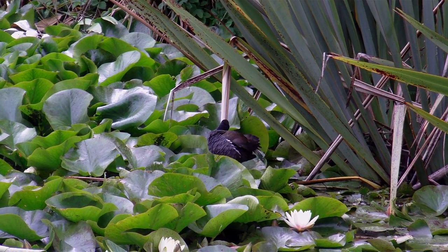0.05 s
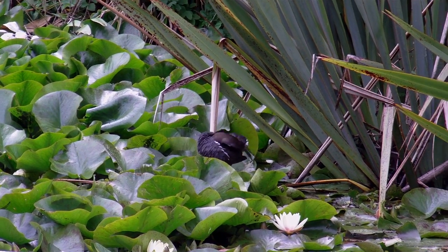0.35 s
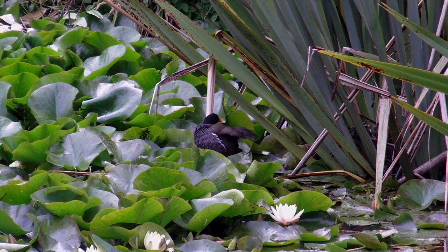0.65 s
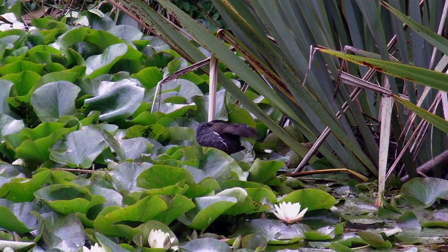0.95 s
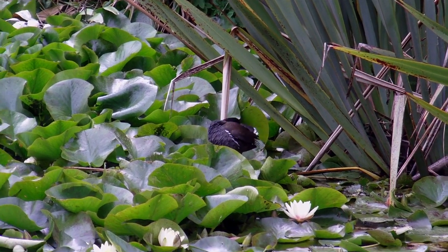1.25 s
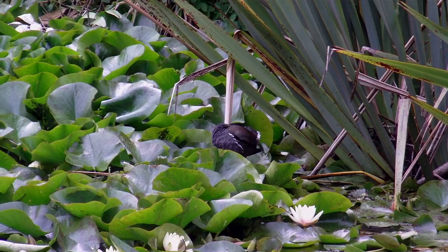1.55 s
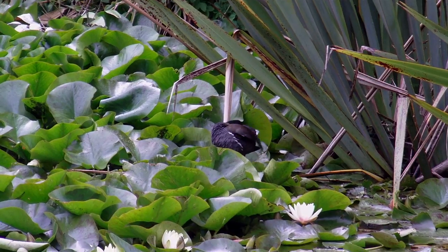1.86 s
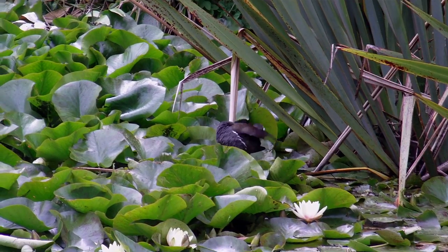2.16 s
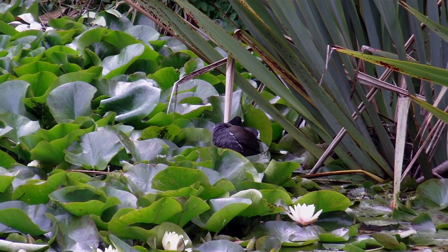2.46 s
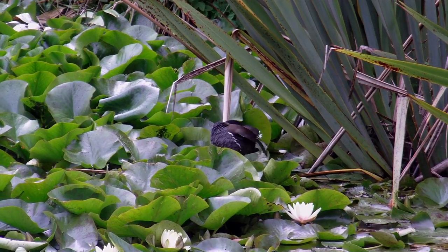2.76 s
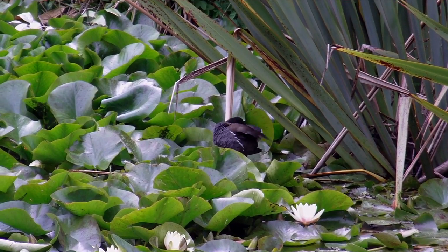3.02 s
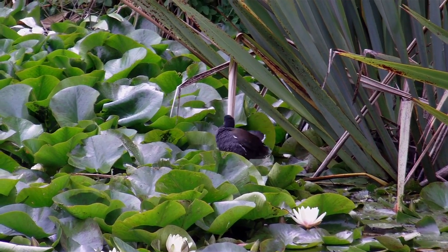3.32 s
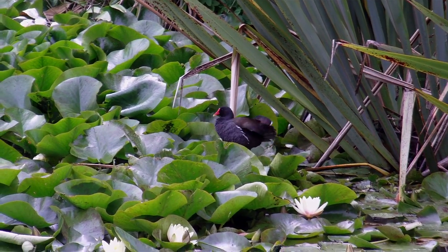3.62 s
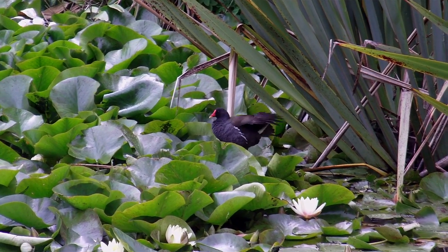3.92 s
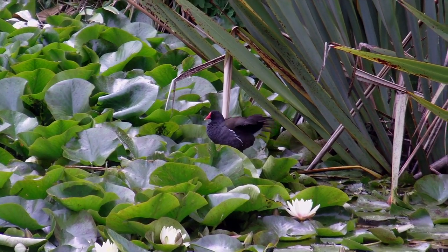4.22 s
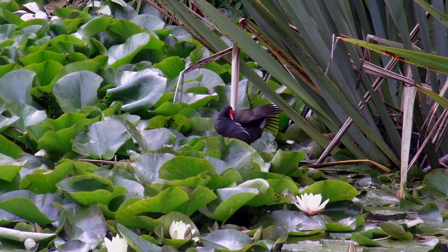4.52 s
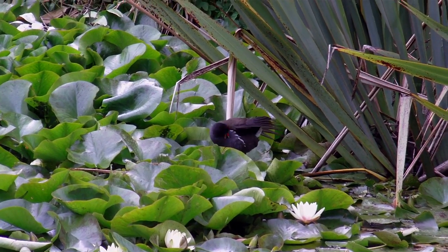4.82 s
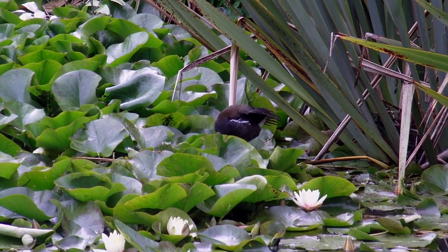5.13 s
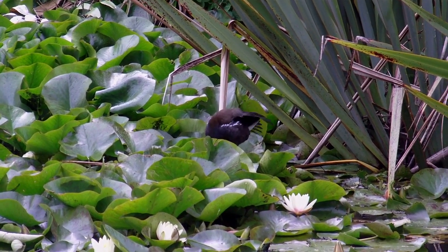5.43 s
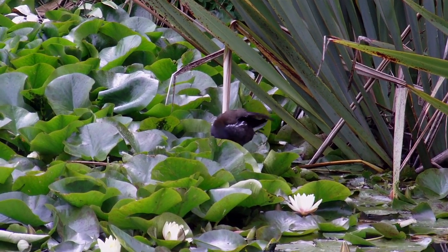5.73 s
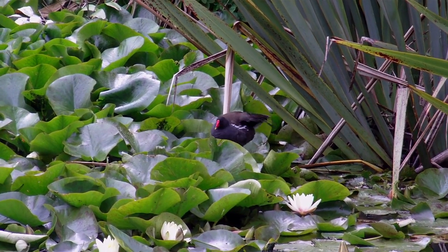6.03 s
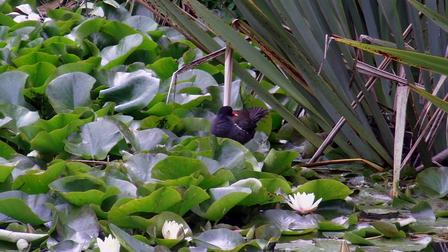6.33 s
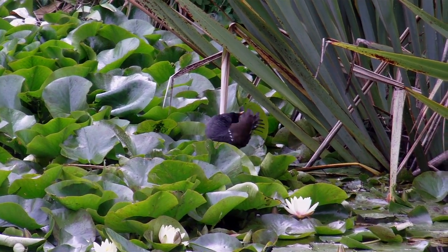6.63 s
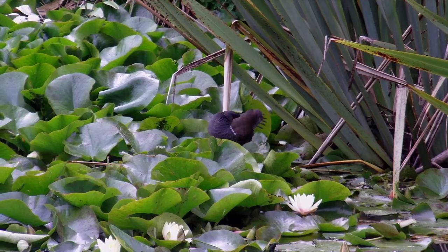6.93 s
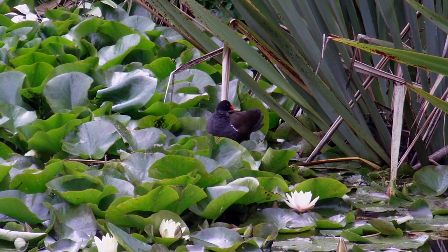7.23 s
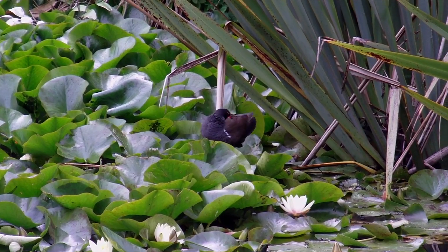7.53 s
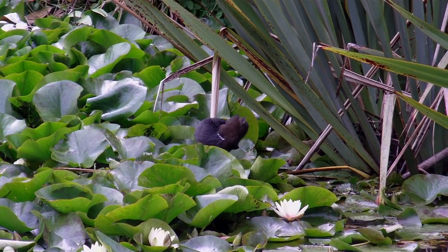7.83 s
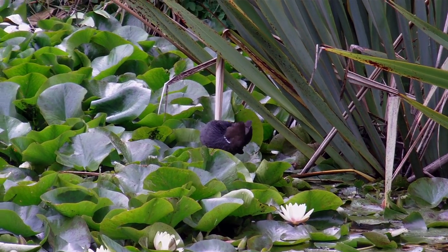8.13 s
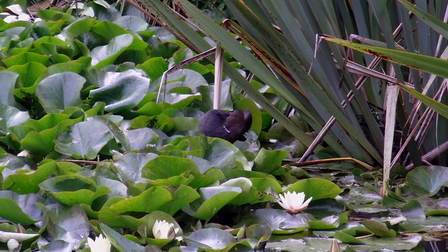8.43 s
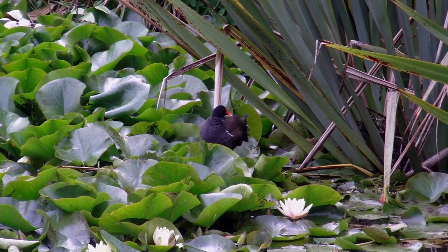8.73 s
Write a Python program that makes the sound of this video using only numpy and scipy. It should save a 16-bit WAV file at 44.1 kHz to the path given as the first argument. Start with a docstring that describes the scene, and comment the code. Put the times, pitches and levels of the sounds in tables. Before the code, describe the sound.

Beside a pond, a soft, even rush like distant water or traffic carries on throughout. Over it a warbler repeats sharp downward chirps, about three a second, and a second one overlaps it later. Fluty whistles come from farther off at the opening and toward the close, with thin twittering in between. Leaves and trees add a slight echo, and the microphone picks up a faint high buzz and two small ticks.

```python
"""Warblers by a lily pond

Two small warblers sing 'chiff-chaff': steep downward notes that echo in the foliage, some trailed
by quick flicks. A farther songbird whistles at the start and near the end; others twitter in the
middle. Each voice is a gliding near-pure tone, scattered by leaves and trunks. Underneath lie a
steady rush like far traffic or water, two dry ticks and a faint buzz of camera electronics."""
import sys
import numpy as np
from scipy import signal
from scipy.fft import rfft, irfft
from scipy.io import wavfile
from scipy.ndimage import uniform_filter1d

SR = 44100
rng = np.random.default_rng(int(sys.argv[2]) if len(sys.argv) > 2 else 0)


def log_audio(samples):
    """Write samples as a 16-bit WAV file to the path given in sys.argv[1]."""
    # one column per channel
    frames = np.atleast_2d(samples).T
    # limit to full scale, then quantise
    limited = np.clip(frames, -1, 1)
    pcm = np.round(limited * 32767).astype(np.int16)
    wavfile.write(sys.argv[1], SR, pcm)


N = 386757


def gain_of(db):
    """Decibels to amplitude."""
    return 10 ** (np.asarray(db) / 20)


def unit_rms(x):
    """Scales to rms 1."""
    return x / np.sqrt(np.mean(x ** 2) + 1e-20)


def add(mix, start_s, sound):
    """Mixes a sound in at its start time."""
    part = mix[max(round(start_s * SR), 0):][:len(sound)]
    part += sound[:len(part)]


def wander(count, rate_hz):
    """Smooth random modulation, rms about 1, moving at up to about the given rate."""
    hz = np.fft.rfftfreq(count + SR, 1 / SR)
    spectrum = rfft(rng.standard_normal(count + SR)) * np.exp(-(hz / rate_hz) ** 2)
    return unit_rms(irfft(spectrum))[:count]


def syrinx(rows, waver, waver_hz, edge_s=0.0011):
    """A bird's voice: a sine along rows of t/s, f/Hz, level/dB, trembling by a share of its pitch."""
    times, hz, db = np.transpose(rows)
    t = np.arange(times[0], times[-1], 1 / SR)
    pitch = np.interp(t, times, hz) * (1 + waver * wander(len(t), waver_hz))
    edges = np.clip(np.minimum(t - t[0], t[-1] - t) / edge_s, 0, 1)
    envelope = edges * gain_of(np.interp(t, times, db))
    return np.sqrt(2) * envelope * np.sin(2 * np.pi * np.cumsum(pitch) / SR)


def foliage(x, early_t60, late_t60, late_db, build_s=0.0032, tilt_db_per_octave=0):
    """Woodland reverb: dense scatter from near leaves and trunks, then a tail from the far trees."""
    t = np.arange(SR * 2 // 3) / SR
    near, far = rng.standard_normal((2, len(t)))
    near = near * gain_of(-60 * t / early_t60) * (1 - np.exp(-t / build_s))
    far = far * gain_of(-60 * t / late_t60) * (1 - np.exp(-t / 0.036))
    impulse = unit_rms(near) + gain_of(late_db) * unit_rms(far)
    octaves = np.log2(np.clip(np.fft.rfftfreq(len(t), 1 / SR), 3000, 6000) / 5000)
    response = rfft(impulse / np.linalg.norm(impulse)) * gain_of(tilt_db_per_octave * octaves)
    return signal.fftconvolve(x, irfft(response, len(t)))


def distant_rush(trim_db=0.5, patchy_db=0.26, size=2048, hop=512):
    """A smooth noise bed, strongest near 1 kHz; the low mids ease, the rumble drifts, the hiss holds."""
    # the bed's spectrum: f/Hz, relative level/dB
    rush_colour = [(30, -47), (38, -24), (54, -39), (78, -25), (140, -26), (200, -15.5), (245, -18),
                   (300, -14.5), (370, -13), (572, -5), (1030, 0.3), (1270, -2.1), (1600, -8), (2000, -11),
                   (3359, -23.5), (6500, -37.5), (14000, -49)]
    # its slow movement: t/s, overall level/dB, low-mid gain/dB, rumble gain/dB
    rush_level = [(0, -47, 3, -5), (1, -47, 0.4, -1), (3.3, -47, 0, -.5), (5, -47, -0.2, -3),
                  (7, -47, -0.2, -2), (8.77, -47, -1.5, 1.5)]
    colour_hz, colour_db = np.transpose(rush_colour)
    times, overall_db, low_mid_db, rumble_db = np.transpose(rush_level)
    t = np.arange(N // hop + 5) * hop / SR
    hz = np.fft.rfftfreq(size, 1 / SR)
    real, imaginary, patches = rng.standard_normal((3, len(t), len(hz)))
    patches = uniform_filter1d(patches, size=10, axis=0)  # smooth in time, then in frequency
    patches = unit_rms(uniform_filter1d(patches, size=16, axis=1))
    colour = np.interp(np.log(hz + 1), np.log(colour_hz), colour_db) - 30 * (hz < 15)
    low_mids = np.interp(t, times, low_mid_db)[:, None] / (1 + (hz / 750) ** 4)
    rumble = np.interp(t, times, rumble_db)[:, None] / (1 + (hz / 90) ** 2)
    spectra = (real + 1j * imaginary) * gain_of(colour + patchy_db * patches + low_mids + rumble)
    _, noise = signal.istft(spectra.T, nperseg=size, noverlap=size - hop)
    return unit_rms(noise[:N]) * gain_of(overall_db.mean() + trim_db)


def camera_buzz(level_db=-68, frame_hz=60.052, ring_hz=7900, ring_db=-15, ring_delay_s=0.0038):
    """The electronics tick once a frame with alternating sign; a brief high ring follows each tick."""
    t = np.arange(N) / SR - 0.0105
    frame = np.round(t * frame_hz)
    age = t - frame / frame_hz
    tick = np.exp(-(age / 0.00047) ** 2)
    ring = gain_of(ring_db) * np.exp(-((age - ring_delay_s) / 0.00086) ** 2)
    return gain_of(level_db) * (-1) ** frame * (tick + ring) * np.sin(2 * np.pi * ring_hz * age)


def dry_ticks(log_width=0.22, attack_s=0.0003, decay_s=0.002):
    """Tiny bursts of band-passed noise, like a dry reed snapping."""
    # snaps: t/s, band centre/Hz, level/dB
    ticks = [(1.066, 3200, -53), (3.205, 9500, -69.5)]
    out, t = np.zeros(N), np.arange(SR // 50) / SR
    hz = np.fft.rfftfreq(len(t), 1 / SR)
    for start_s, centre_hz, db in ticks:
        burst = rng.standard_normal(len(t)) * np.exp(-t / decay_s) * (1 - np.exp(-t / attack_s))
        band = np.exp(-0.5 * (np.log((hz + 1) / centre_hz) / log_width) ** 2)
        snap = irfft(rfft(burst) * band, len(t))
        add(out, start_s, gain_of(db) * snap / snap[:round(decay_s * SR)].std())
    return out


def twittering_birds(trim_db=-4, echo_db=-3, rasp_depth_hz=210, rasp_db=2.5):
    """Falling chirps, most from farther birds deep in the trees, the last two quick flicks trailing a warbler's
    note; all rasp in pitch and level, with nearly as much echo as voice."""
    # chirps: t/s, length/s, first pitch/Hz, last pitch/Hz, level before trim/dB; the last two are flicks after
    # the warbler's note at 4.77 s
    twitters = [(3.32, .09, 8540, 8060, -68.5), (3.603, 0.14, 7900, 7040, -72),
                (3.917, 0.029, 4010, 3820, -54.5), (3.949, 0.038, 3650, 3290, -56),
                (3.987, .022, 4040, 3500, -59), (4.063, 0.04, 4400, 4020, -48.5),
                (4.088, 0.045, 4080, 3620, -55), (4.12, 0.027, 4100, 3250, -58),
                (4.328, .042, 5780, 3460, -49), (4.37, .026, 3260, 3030, -55),
                (4.855, 0.022, 4900, 4270, -60), (4.899, 0.022, 4750, 4200, -60.5)]
    out, progress = np.zeros(N), np.linspace(0, 1, 100)
    swell_db = np.interp(progress, [0, 0.44, 1], [-15, 0, -7])
    for start_s, length_s, first_hz, last_hz, db in twitters:
        hz = last_hz + (first_hz - last_hz) * (1 - progress) ** 1.4  # the fall flattens out
        contour = np.transpose([progress * length_s, hz, db + trim_db + swell_db])
        tone = syrinx(contour, waver=rasp_depth_hz / first_hz, waver_hz=453)
        tone *= unit_rms(gain_of(rasp_db * wander(len(tone), rate_hz=160)))
        add(out, start_s, tone)
        add(out, start_s, gain_of(echo_db) * foliage(tone, early_t60=0.15, late_t60=1.0, late_db=-1))
    return out


def whistling_bird(trim_db=-1, echo_db=-12.5, flutter_hz=28.7):
    """Fluty whistles, a few husky, glide onto a pitch, flutter and slip off it; far trees add a tail."""
    # whistles: t/s, length/s, first pitch/Hz, held pitch/Hz, last pitch/Hz, glide on/s, glide off/s,
    # swell/s, fade/s, huskiness/0-1, flutter depth/dB, level before trim/dB
    whistles = [(.275, 0.061, 2830, 2980, 3200, .024, .021, .035, .02, 0, -2, -62),
                (.335, 0.16, 2240, 2265, 2520, .035, 0.021, .07, .04, 0.75, 3, -57.5),
                (0.425, .115, 2550, 2355, 2330, .012, 0.017, .055, 0.033, 0, 0.5, -53.5),
                (0.742, .197, 2460, 2715, 2540, 0.057, 0.018, .09, 0.044, 0.03, 0, -58),
                (6.99, 0.07, 2490, 2550, 2490, .024, 0.021, .035, .02, 0, 0, -57.5),
                (7.429, .158, 3750, 2400, 3030, .023, 0.017, 0.084, 0.054, 0, 1.5, -49),
                (7.574, 0.087, 3120, 2450, 2460, 0.026, .02, 0.051, 0.032, 0.1, 0, -47),
                (7.834, 0.16, 1740, 1865, 2085, .047, .035, .07, .02, 0.95, 2, -52),
                (8.033, 0.068, 2260, 2190, 2800, 0.012, .0091, 0.038, .012, 0.06, 1, -47.5),
                (8.005, .27, 2690, 2490, 2410, 0.029, 0.028, .1, .075, 0.13, 3, -54.5),
                (8.105, .108, 1640, 1925, 1950, 0.044, .015, 0.029, .025, 0.2, -2, -51.5),
                (8.306, 0.18, 3370, 2910, 2960, 0.089, .023, 0.065, 0.019, 0.03, .7, -50.5),
                (8.65, .065, 2840, 2800, 2780, .02, .022, .03, .02, 0.4, 3, -60),
                (8.652, .077, 2170, 2150, 2110, .022, .018, 0.032, .025, 0.37, 1, -56.5),
                (8.717, 0.057, 2800, 2430, 2320, 0.018, .017, 0.026, .012, 0.04, 2, -54.5),
                (8.726, 0.05, 2090, 2010, 1970, .015, 0.019, .02, .012, 0, 0, -55.5)]
    out = np.zeros(N)
    for (start_s, length_s, first_hz, held_hz, last_hz, on_s, off_s,
         swell_s, fade_s, husky, flutter_db, db) in whistles:
        t = np.linspace(0, length_s, 100)
        glide_on = (first_hz - held_hz) * np.exp(-t / on_s)
        glide_off = (last_hz - held_hz) * np.exp((t - length_s) / off_s)
        swell_db = -13.5 * np.maximum(1 - t / swell_s, 0)
        fade_db = -9 * np.maximum(1 - (length_s - t) / fade_s, 0)
        flutter = np.sin(2 * np.pi * (flutter_hz * t + rng.random()))
        level_db = db + trim_db + swell_db + fade_db + flutter_db * flutter
        contour = np.transpose([t, held_hz + glide_on + glide_off, level_db])
        tone = syrinx(contour, waver=0.003 + 0.045 * husky, waver_hz=220, edge_s=0.006)
        add(out, start_s, tone)
        add(out, start_s, gain_of(echo_db) * foliage(tone, early_t60=0.2, late_t60=1.2, late_db=7))
    return out


def warbler_flicks(length_s=0.0236, fall_ratio=0.87):
    """Quick slurs trailing some notes: each swells and fades as it drops two to three semitones."""
    # slurs: t/s, first pitch/Hz, level/dB, echo send/dB
    flicks = [(.879, 4030, -64.5, 3), (1.291, 4250, -69, -2), (1.625, 5050, -64, -4), (1.872, 4150, -68, 0),
              (2.275, 4300, -69, 0), (2.596, 5020, -62, 0), (2.844, 4050, -63, -2), (3.583, 4870, -63, -9),
              (6.24, 4300, -69, -8), (7.2, 4300, -72, -5), (7.557, 5150, -70, -5), (8.215, 4300, -69, -3)]
    out = np.zeros(N)
    for start_s, hz, db, echo_db in flicks:
        contour = [(0, hz, db - 7),
                   (length_s / 2, hz * np.sqrt(fall_ratio), db),
                   (length_s, hz * fall_ratio, db - 7)]
        tone = syrinx(contour, waver=0.0065, waver_hz=200)
        add(out, start_s, tone)
        add(out, start_s, gain_of(echo_db) * foliage(tone, early_t60=0.3, late_t60=0.54, late_db=-6))
    return out


def warbler_note(shape, first_phrase, plunge_db, held_db, bottom_hz, sustain_db=-10):
    """One note as rows of t/s, f/Hz, level/dB: a plunge from about 7 kHz, a held arch, a fading droop."""
    plunge_s, held_s, width_s, arch_hz, droop_hz = shape
    # after the first phrase, notes start higher, bend less and fade sooner
    top_hz, bend, release = (6820, 0.99, 0.9) if first_phrase else (7120, 0.85, 1.5)
    t = np.linspace(0, held_s + 2 * width_s, 100)
    past_crest = (t - held_s) / width_s
    dive = np.exp(-(t / plunge_s) ** 1.73)
    arch = np.exp(-past_crest ** 2)
    droop = np.maximum(past_crest / 2, 0) ** 3
    hz = bottom_hz + (top_hz - bottom_hz) * dive + bend * (arch_hz * arch - droop_hz * droop)
    # two swells, with the voice easing off between them
    plunge = np.exp(-((t / plunge_s - 1) / 0.79) ** 2)
    sustain = gain_of(sustain_db) * np.clip(t / plunge_s, 0, 1) * np.clip(2 * (1 - t / held_s), 0, 1)
    held = np.where(past_crest < 0, arch, 1 / (1 + release * past_crest ** 2))
    level = np.maximum(gain_of(plunge_db) * np.maximum(plunge, sustain), gain_of(held_db) * held)
    return np.transpose([t, hz, 20 * np.log10(level)])


def warblers(shape, notes, trim_db, wet_db, leaves_db=-5, first_phrase_end_s=4.6):
    """The lead song: leaves around the bird blur each plunge, and the trees behind prolong the note."""
    # echo from the trees: t/s, diffuse send before wet_db/dB, slapback delay/s, slapback gain/dB
    song_echo = [(.2, -8.5, .04, -20), (.53, -5, 0.034, -15), (.83, 2, .05, -3), (1.16, -5, 0.027, -5),
                 (1.5, -1.5, 0.04, -12), (1.82, -1, .035, -13), (2.13, -11, 0.034, -14),
                 (2.46, -7, 0.052, -11), (2.78, -8, .06, -15), (3.44, -4, .04, -17), (4.4, -9, .04, -19),
                 (5.6, -6, 0.035, -17), (6.5, -12, 0.037, -20), (8.77, -9, .04, -22)]
    echo_times, *echo_curves = np.transpose(song_echo)
    out = np.zeros(N)
    for start_s, plunge_db, held_db, bottom_hz in notes:
        contour = warbler_note(shape, start_s < first_phrase_end_s, plunge_db, held_db, bottom_hz)
        tone = gain_of(trim_db) * syrinx(contour, waver=0.005, waver_hz=130)
        echo_db, slap_s, slap_db = (np.interp(start_s, echo_times, curve) for curve in echo_curves)
        leaves = foliage(tone, early_t60=0.075, late_t60=0.28, late_db=-15,
                         build_s=0.002, tilt_db_per_octave=8)
        trees = foliage(tone, early_t60=0.26, late_t60=0.68, late_db=1,
                        build_s=0.0099, tilt_db_per_octave=-0.5)
        add(out, start_s, tone)
        add(out, start_s + slap_s, gain_of(slap_db) * tone)
        add(out, start_s, gain_of(leaves_db) * leaves + gain_of(echo_db + wet_db) * trees)
    return out


def scene():
    """The warblers in front, farther birds behind, all over the distant rush, in mono."""
    # shapes of the low 'chaff', middle 'chiff' and short high 'chee':
    # plunge time/s, crest of the held swell/s, its half width/s, arch and droop at full bend/Hz
    chaff_shape = (.0105, 0.05, 0.0195, 231, 460)
    chiff_shape = (.0108, .06, 0.0215, 239, 480)
    chee_shape = (.0138, 0.028, 0.015, 28, 170)
    # notes sung: t/s, plunge level before trim/dB, held level before trim/dB, bottom pitch/Hz
    chaffs = [(0.204, -58, -66, 3850), (1.1636, -60.5, -61, 3700), (2.133, -54, -59, 3720),
              (3.1166, -67, -68, 3740), (4.0746, -61, -61, 3550), (5.068, -64, -65, 3720),
              (5.775, -63, -63, 3715), (6.1097, -64, -63, 3695), (6.7346, -64, -70, 3640),
              (7.074, -59.5, -64, 3720), (7.358, -57.5, -62, 3560), (8.09, -63.5, -67, 3700),
              (8.3036, -59.5, -74, 3740)]
    chiffs = [(0.535, -57.5, -62, 4460), (1.4966, -60, -62, 4530), (2.458, -54.5, -54.5, 4526),
              (3.441, -64, -65, 4420), (4.429, -65, -60.5, 4460), (5.15, -67, -69, 4510),
              (5.4093, -65, -65, 4470), (6.097, -62.5, -65, 4500), (6.4146, -63, -73, 4530),
              (6.4547, -59.5, -60.5, 4470), (7.0586, -65, -74, 4430), (7.42, -62, -62, 4500),
              (7.693, -60, -59.5, 4350), (8.609, -62.5, -72, 4550)]
    chees = [(.8268, -63, -70, 5640), (1.823, -58, -60, 5280), (2.7838, -54, -54, 5330),
             (3.773, -62, -73, 5430), (4.7738, -66.5, -69, 5230), (5.4404, -66, -69, 5350),
             (5.7464, -67, -69, 5470), (6.753, -58, -63, 5260), (7.752, -67, -70, 5600),
             (8.0023, -59, -63, 5300)]
    song = (warblers(chaff_shape, chaffs, trim_db=-0.6, wet_db=5.5)
            + warblers(chiff_shape, chiffs, trim_db=-1.1, wet_db=2)
            + warblers(chee_shape, chees, trim_db=-0.8, wet_db=0)
            + warbler_flicks())
    far_birds = whistling_bird() + twittering_birds()
    return (song + far_birds + dry_ticks() + distant_rush() + camera_buzz())[None]


def record(dry):
    """A 4 ms fade-in and a steep low-pass on the whole mix."""
    fade_in = np.clip(np.arange(N) / SR / 0.004, 0, 1)
    low_pass = signal.firwin(511, cutoff=15250, window=("kaiser", 9), fs=SR)
    return signal.oaconvolve(dry * fade_in, low_pass[None], "same")


dry = scene()
out = record(dry)
log_audio(out)
```